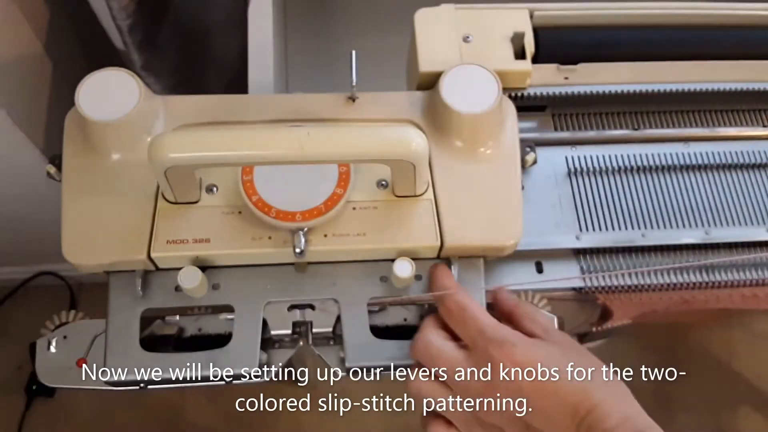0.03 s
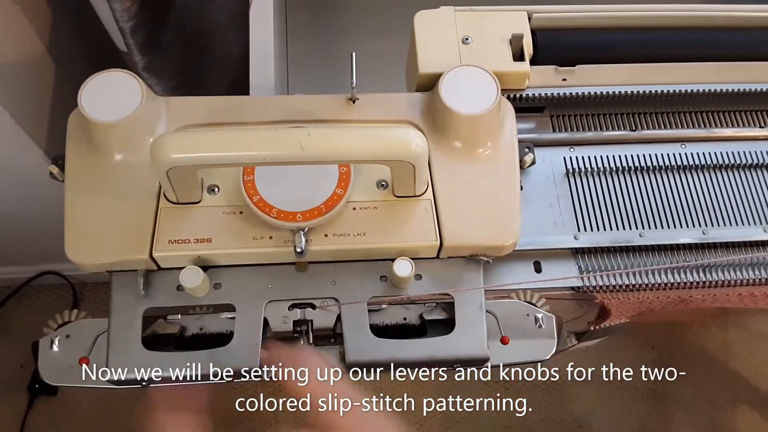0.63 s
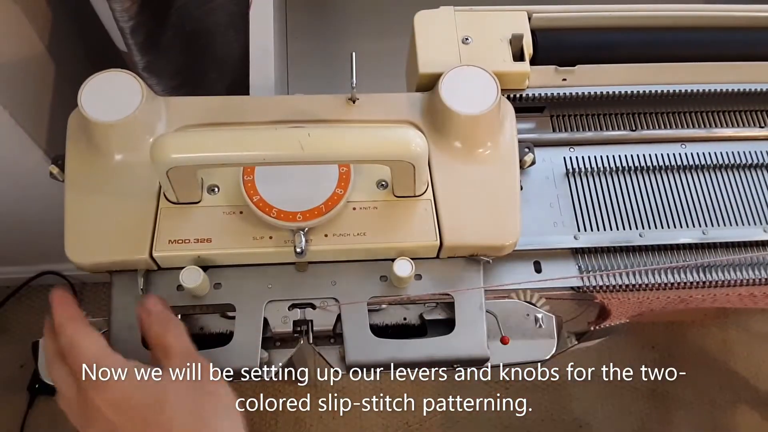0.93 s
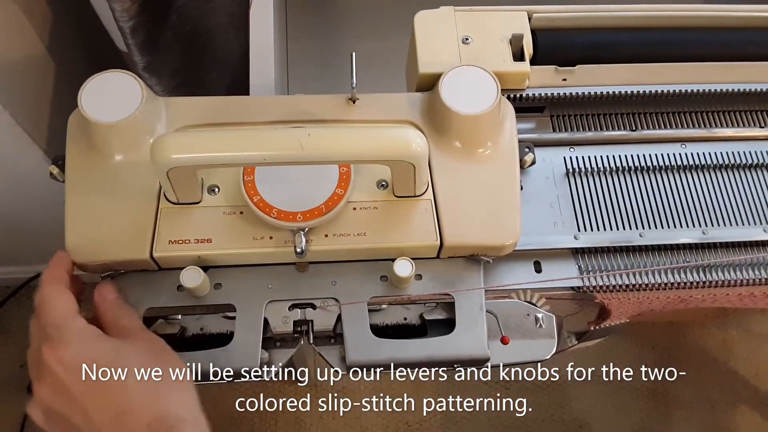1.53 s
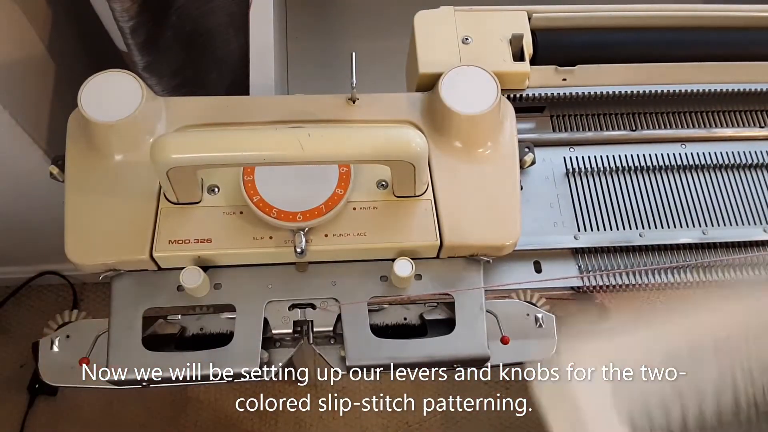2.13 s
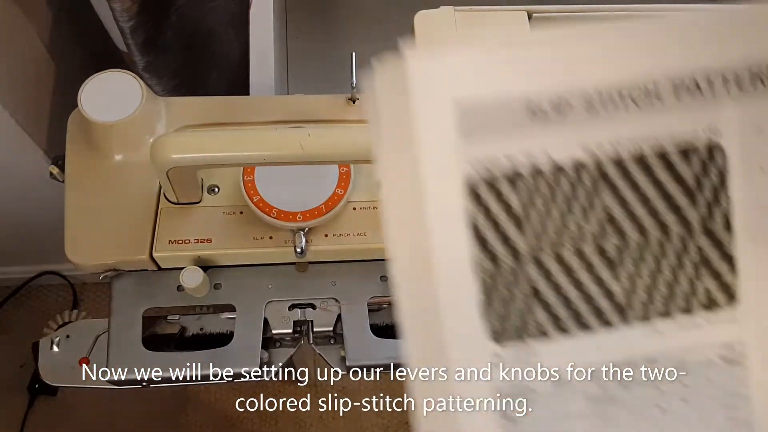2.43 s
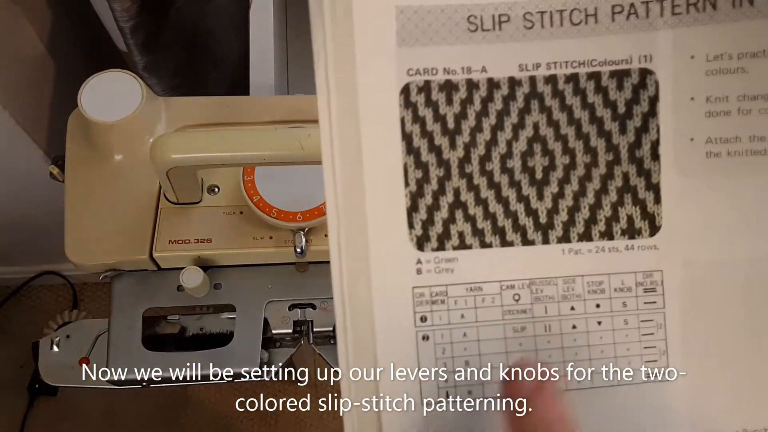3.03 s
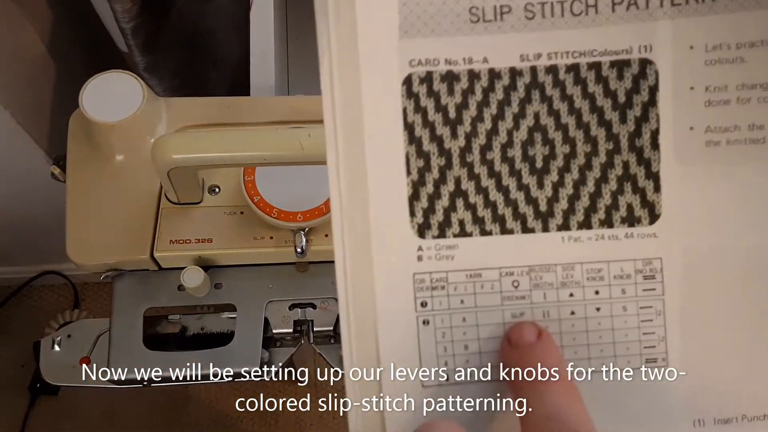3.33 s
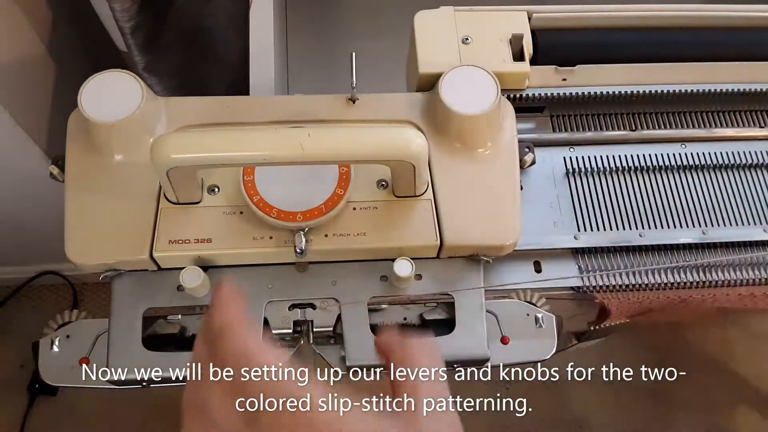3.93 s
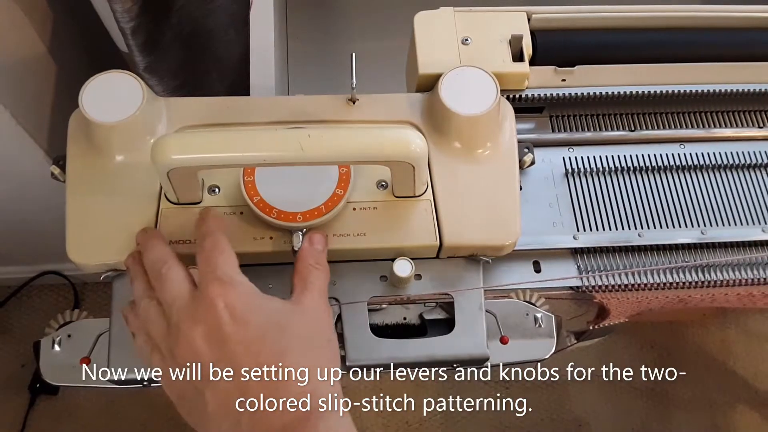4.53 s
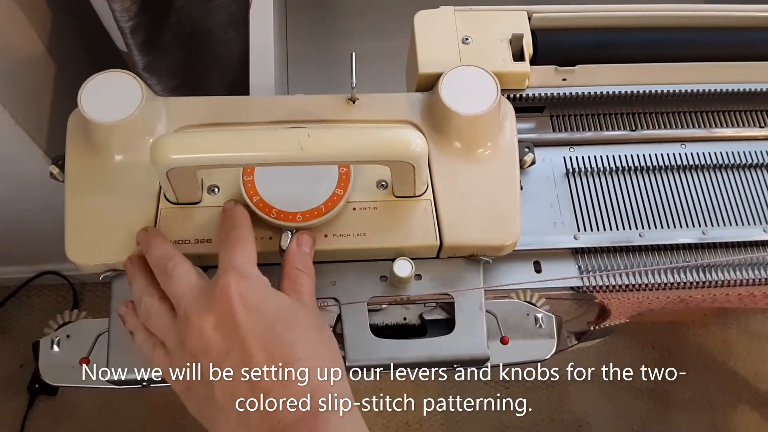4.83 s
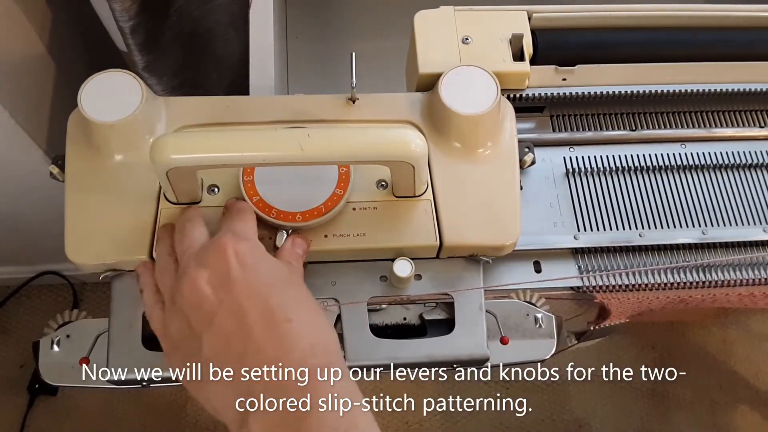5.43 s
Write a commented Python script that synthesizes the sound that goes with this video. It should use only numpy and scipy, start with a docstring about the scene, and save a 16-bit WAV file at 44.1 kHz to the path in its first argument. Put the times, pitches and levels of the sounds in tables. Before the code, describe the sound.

Two sharp, ringing lever clacks on a knitting machine, then faint paper rustles and light clicks over a low room hum.

```python
"""Knitting machine carriage in a small humming room, with hiss and a faint pulsing whine throughout.
A hand snaps over the right lever (0.2 s), then the left (1.5 s): each slips, slams on its stop and
sets the shell and a spring ringing. Gain control ducks the background for a second after each.
The hand slides off the lever (1.8 s); a soft knock on the casing (2.3 s); a paper manual rustles
(2.4-4.5 s). The dial is nudged (4.6 s); light touches, a second knock and a last rustle follow."""
import sys
import numpy as np
from scipy import signal
from scipy.fft import rfft, irfft
from scipy.io import wavfile
from scipy.ndimage import uniform_filter1d, minimum_filter1d

SR = 44100
rng = np.random.default_rng(int(sys.argv[2]) if len(sys.argv) > 2 else 0)


def store_pcm(level_fs):
    """Save levels as 16-bit WAV."""
    pcm = np.round(np.clip(level_fs, -1, 1) * 32767).astype(np.int16)
    wavfile.write(sys.argv[1], SR, np.atleast_2d(pcm).T)


N = 250929

# slip, slam on the stop, rattle: t/s, crack/dB, ring/dB
RIGHT_LEVER_BLOWS = [(.2, -71.5, -53), (.2165, -50.5, -32), (.2195, -43, -29.5), (.2257, -4.5, -17.5),
                     (.232, -9.5, -20.5), (.2355, -13, -18), (.2445, -18.5, -22.5), (.264, -21, -34.5)]
LEFT_LEVER_BLOWS = [(1.484, -59.5, -51.5), (1.5025, -27, -31), (1.5113, -4, -4.5), (1.517, -5.5, -2.5),
                    (1.5195, -11, -1), (1.549, -19, -24)]
DIAL_NUDGE_BLOWS = [(4.618, -46, -43), (4.6225, -42, -36.5), (4.6245, -45, -33), (4.65, -50.5, -46)]
# right lever leaving its catch, fingertips on the dial, casing knocks: t/s, crack/dB, ring/dB
CATCH_BLOWS = [(.2108, -26.5, -52), (.2132, -14.5, -46)]
FINGER_BLOWS = [(4.725, -67, -58), (4.796, -66, -56), (5.044, -78, -53)]
CASING_BLOWS = [(2.343, -54, -64), (5.26, -62, -71)]
# modes of each part: f/Hz, level/dB, t60/s
RIGHT_LEVER_MODES = [(501, -28.5, .12), (705, -19.5, .05), (784, -12, 0.054), (880, -7.5, 0.041),
                     (1151, -9, 0.074), (1647, -4.5, .045), (1780, -2, 0.056), (1927, -3.5, 0.052),
                     (2304, -8, 0.083), (2627, -3, .05), (3330, -7, .05), (4042, -7.5, 0.058),
                     (4366, -5.5, 0.1), (4530, -8, 0.06), (5022, -6, .06), (6330, -6.5, .05),
                     (6892, -5, 0.037), (8280, -8.5, 0.076)]
LEFT_LEVER_MODES = [(368, -37, .12), (522, -27.5, .1), (1030, -1.5, 0.032), (1268.4, -17, 0.045),
                    (1573, -5, 0.03), (1624, -5.5, 0.047), (1760, -4, .035), (1863.5, -1.5, 0.041),
                    (2586, -9, 0.062), (2570, -23, .11), (3985, -14.5, 0.051), (6470, -13, .04),
                    (7120, -17, 0.026)]
DIAL_BODY_MODES = [(1190, -15, 0.026), (1654, -9, 0.035), (1747, 3, 0.027), (1920, -10, 0.034),
                   (3730, -16, 0.038)]
CASING_MODES = [(645, -1, .05), (877, 0, 0.064), (1060, -3, 0.077), (1570, -17, .05)]
# dense shell modes each part wakes: f/Hz, level/dB
RIGHT_SPECTRUM = [(30, -19), (70, -4.5), (130, -6), (260, -8), (480, -20.5), (800, -4.5), (1150, -7),
                  (1420, -15.5), (1750, -0.5), (3100, -4.5), (4600, 2), (6700, -1), (9000, -6.5),
                  (15000, -10.5)]
LEFT_SPECTRUM = [(30, -26), (110, -23.5), (200, -7.5), (400, -11), (720, -20.5), (1600, 1.5), (2200, -5.5),
                 (2600, 2.5), (3000, -2.5), (3900, 2), (5500, -1), (6700, 3), (9000, -9.5), (13500, -15.5),
                 (15500, -16)]
DIAL_SPECTRUM = [(100, -5), (300, 19), (600, 2.5), (1100, 10), (1900, 8), (2800, 0.5), (4600, 2.5),
                 (6200, -7), (9500, -2.5), (16000, -29)]
CASING_SPECTRUM = [(100, -3), (300, 2), (600, -0.5), (1000, -7), (2000, -4), (3000, -12), (6000, -13),
                   (16000, -26)]
# springs and needle bed: t/s, f/Hz, level/dB, t60/s, rise/s
SPRING_RINGS = [(0.226, 84.9, -43, 0.08, .003), (0.23, 246, -32.5, 1.72, 0.0083),
                (0.23, 140, -43.5, 0.25, 0.0062), (0.26, 262.7, -27, 0.2, .02),
                (1.52, 246, -37.5, 0.78, 0.011), (1.528, 187, -22.5, .14, .02),
                (1.53, 268.6, -31, 0.19, 0.014), (4.623, 285, -40.5, 0.22, 0.0083)]
# paper, sleeve, fingers: peak t/s, length/s, level/dB, tilt/(dB/oct), left minus right/dB
RUSTLE_STROKES = [(.16, 0.33, -75.5, -1.5, 0.5), (1.504, 0.089, -64, 1, 0), (1.769, 0.32, -73, -4, 1.5),
                  (2.413, 0.16, -68.5, -1.5, 1.5), (2.74, 0.27, -78, -8, 0), (2.848, 0.16, -64.5, 1, 1),
                  (3.11, 0.057, -78, 6.5, -2), (3.599, 0.082, -74, 5.5, 5), (4.24, 0.86, -68.5, -3.5, -3.5),
                  (5.622, 0.072, -65.5, -1, 2)]
# room decay: f/Hz, t60/s
ROOM_T60 = [(300, 0.26), (1000, 0.15), (2000, 0.165), (5000, 0.155), (12000, .16)]
# noise spectra: f/Hz, level/dB
PAPER_SPECTRUM = [(300, -4), (700, -1), (1100, -9.5), (1900, 6), (2600, -3.5), (5000, -4), (9000, -2.5),
                  (16000, -15.5)]
HUM_SPECTRUM = [(20, -18.5), (45, -10.5), (90, -2.5), (170, -4), (270, 0.5), (380, 1), (480, -8.5),
                (620, -19), (1000, -28.5), (2500, -46), (8000, -68.5)]
HISS_SPECTRUM = [(300, 0.5), (1300, -0.5), (1850, 6), (2400, -0.5), (5500, -3), (7500, -1.5), (11000, -3.5),
                 (15500, -1), (16200, -26.5)]
WHINE_SPECTRUM = [(1000, -40), (5800, -25), (6700, -7), (7200, 0.5), (8000, -6), (8800, -12.5), (9600, -7),
                  (11000, -21), (16000, -29)]
# slow drift of the hum: t/s, level/dB
HUM_DRIFT = [(0, -1), (2.2, -1), (3.2, -3), (3.4, 0), (5.69, 0)]
# stereo width of the hum: f/Hz, side minus mid/dB
HUM_WIDTH = [(60, -8.5), (350, -11), (550, -3.5), (1000, 1.5)]


def clacks(blows, modes, spectrum, crack_t60_s, shell_db, shell_t60_s, swell_s,
           lag_ms, left_db, tilt_db_oct, dulling_per_oct):
    """Each blow: a hard crack, a short shell buzz, then the part's modes. Softer blows are duller."""
    out, t = np.zeros((2, N)), np.arange(16384) / SR
    ear_t = np.maximum(t - np.array([[-lag_ms], [lag_ms]]) / 2000, 0)  # left leads by lag_ms
    rings = np.array([amp(db) * fade(ear_t, t60) * np.sin(2 * np.pi * hz * ear_t)
                      for hz, db, t60 in modes])
    rings *= 1 - np.exp(-t / swell_s)
    envelope = fade(t, crack_t60_s) + amp(shell_db) * fade(t, shell_t60_s)
    hardest_db = max(crack_db for _, crack_db, _ in blows)
    for s, crack_db, ring_db in blows:
        tilt = tilt_db_oct - dulling_per_oct * (hardest_db - crack_db)
        burst = coloured(envelope * rng.standard_normal((2, len(t))), spectrum, tilt)
        weights = amp(ring_db + tilt * octaves(np.array(modes)[:, 0]))
        add(out, s, amp(crack_db) * burst + np.tensordot(weights, rings, 1))
    return panned(out, left_db)


def springs():
    """The jolt spreads into springs and needle bed, which swell and ring low."""
    out, t = np.zeros((2, N)), np.arange(2 * SR) / SR
    for s, hz, db, t60_s, rise_s in SPRING_RINGS:
        tone = amp(db) * (1 - np.exp(-t / rise_s)) * fade(t, t60_s) * np.sin(2 * np.pi * hz * t)
        add(out, s, panned(tone, left_db=3.5))
    return out


def rustle(grain_db=2.5, snaps_per_s=100, snap_db=-8, rise_share=0.55, edge_db=-12.5):
    """Paper, sleeve and fingers slide in uneven grains with tiny snaps; each stroke swells and dies."""
    snaps = rng.standard_normal((2, N)) * (rng.random(N) < snaps_per_s / SR)
    snaps = unit(shaped(snaps, PAPER_SPECTRUM))
    friction = noise(PAPER_SPECTRUM, correlation=0.1) + amp(snap_db) * snaps
    hz, t, bins = signal.stft(friction, SR, nperseg=256)
    power = 0
    for s, length_s, level_db, tilt, left_db in RUSTLE_STROKES:
        away = np.maximum((s - t) / rise_share, (t - s) / (1 - rise_share)) / length_s  # peak 0, ends 1
        stroke = amp(level_db + edge_db * away + tilt * octaves(hz)[:, None])
        power = power + (panned(0.98, left_db)[:, None] * stroke) ** 2
    grains = amp(grain_db * rng.standard_normal(len(t)))
    return signal.istft(bins * np.sqrt(power) * grains, SR, nperseg=256)[1][:, :N]


def room(x, wet_db=-8.5, build_s=0.009, echoes_per_s=5000, late_db=-34, late_t60_s=0.42):
    """Small furnished room: sparse reflections build and die fast over a faint slower tail."""
    t = np.arange(SR // 2) / SR
    taps = rng.standard_normal((2, len(t))) * (rng.random((2, len(t))) < echoes_per_s / SR)
    hz, frame_s, bins = signal.stft(taps, SR, nperseg=256)
    decay = amp(-60 * frame_s / read(ROOM_T60, hz)[:, None]) + amp(late_db - 60 * frame_s / late_t60_s)
    tail = signal.istft(bins * decay, SR, nperseg=256)[1][:, :len(t)]
    tail *= 1 - np.exp(-(t / build_s) ** 2)
    tail /= np.linalg.norm(tail, axis=1, keepdims=True)
    return x + amp(wet_db) * signal.fftconvolve(x, tail, axes=1)[:, :N]


def room_hum(level_db=-61, waver_db=0.34, waver_hz=4):
    """Low wavering noise from all around, most alike between the ears in the bass."""
    t, hz = np.arange(N) / SR, np.fft.rfftfreq(N, 1 / SR)
    drift_db = np.interp(t, *np.transpose(HUM_DRIFT))
    waver = unit(irfft(rfft(rng.standard_normal(N)) * hz * np.exp(-(hz / waver_hz) ** 2), N))
    mid, side = noise(HUM_SPECTRUM, correlation=0)
    side = shaped(side, HUM_WIDTH)
    hum = unit(np.array([mid + side, mid - side]))
    return panned(amp(level_db + drift_db + waver_db * waver) * hum, left_db=1.1)


def whine(level_db=-65.5, rate_hz=30.012, start_s=0.02405, width=0.5, jitter_s=0.0027, uneven_db=1.77):
    """Electronic whine, left only: high noise in slightly uneven pulses over a steady floor."""
    cycles = rate_hz * (np.arange(N) / SR - start_s)
    index = np.round(cycles).astype(int) + 1
    late_cycles = jitter_s * rate_hz * rng.uniform(-0.81, 1, index[-1] + 1)
    strength = amp(uneven_db * rng.standard_normal(len(late_cycles)))
    pulses = strength[index] * np.exp(-(np.sin(np.pi * (cycles - late_cycles[index])) / width) ** 2)
    return amp(level_db) * (pulses + 0.12) * noise(WHINE_SPECTRUM, correlation=1) * [[1], [0]]


def hiss(level_db=-72):
    """Steady microphone noise."""
    return amp(level_db) * noise(HISS_SPECTRUM, correlation=0.09)


def close_pair(x, corner_hz):
    """Long waves reach both microphones alike: the side signal loses its bass."""
    mid, side = (x[0] + x[1]) / 2, (x[0] - x[1]) / 2
    hz = np.fft.rfftfreq(N, 1 / SR)
    side = irfft(rfft(side) * hz / np.hypot(hz, corner_hz), N)
    return np.array([mid + side, mid - side])


def gain_control(x, threshold_db, deepest_db, hold_s, recovery_db_per_s):
    """A loud peak cuts the gain at once; it holds, then creeps back."""
    level_db = 20 * np.log10(abs(x).max(0) + 1e-9)
    over_db = np.clip(level_db - threshold_db, 0, deepest_db)
    half = int(hold_s * SR / 2)
    held_db = -minimum_filter1d(-over_db, 2 * half + 1, origin=half, mode="constant")
    ramp_db = recovery_db_per_s * np.arange(N) / SR
    cut_db = np.maximum.accumulate(held_db + ramp_db) - ramp_db
    return x * amp(-uniform_filter1d(cut_db, size=100))


def amp(db):
    """dB to gain."""
    return 10 ** (np.asarray(db) / 20)


def unit(x):
    """Scale to rms 1."""
    return x / np.sqrt(np.mean(x ** 2) + 1e-20)


def fade(t, t60_s):
    """Exponential decay."""
    return amp(-60 * t / t60_s)


def read(points, hz):
    """Interpolate over log frequency."""
    f, value = np.transpose(points)
    return np.interp(np.log(hz + 1), np.log(f + 1), value)


def octaves(hz):
    """Octaves above 3500 Hz, flat below 400 Hz."""
    return np.log2(np.maximum(hz, 400) / 3500)


def add(mix, s, sound):
    """Mix in a stereo sound at time s."""
    part = mix[:, round(s * SR):][:, :sound.shape[1]]
    part += sound[:, :part.shape[1]]


def panned(x, left_db):
    """Pan by left minus right level."""
    return x * amp([[left_db / 2], [-left_db / 2]])


def shaped(x, spectrum):
    """Zero-phase filter over N samples."""
    return irfft(rfft(x) * amp(read(spectrum, np.fft.rfftfreq(N, 1 / SR))), N)


def noise(spectrum, correlation):
    """Shaped stereo noise, rms 1."""
    a, b = rng.standard_normal((2, N))
    pair = np.array([a, correlation * a + np.sqrt(1 - correlation ** 2) * b])
    return unit(shaped(pair, spectrum))


def coloured(x, spectrum, tilt_db_oct):
    """Minimum-phase filter, unit power gain; keeps attacks sharp."""
    size = x.shape[1]
    hz = np.fft.rfftfreq(size, 1 / SR)
    gain = unit(amp(read(spectrum, hz) + tilt_db_oct * octaves(hz)))
    log_gain = np.log(np.r_[gain, gain[-2:0:-1]])
    response = np.exp(np.conj(signal.hilbert(log_gain)))[:len(hz)]
    return irfft(rfft(x) * response, size)


def scene():
    """Levers, dial, casing, manual and background; the catch ticks stay dry."""
    catch = clacks(CATCH_BLOWS, RIGHT_LEVER_MODES, RIGHT_SPECTRUM,
                   crack_t60_s=0.007, shell_db=-28, shell_t60_s=0.044, swell_s=0.001,
                   lag_ms=0, left_db=-1, tilt_db_oct=2.2, dulling_per_oct=0.15)
    right = clacks(RIGHT_LEVER_BLOWS, RIGHT_LEVER_MODES, RIGHT_SPECTRUM,
                   crack_t60_s=0.041, shell_db=-10, shell_t60_s=0.078, swell_s=0.0014,
                   lag_ms=0.13, left_db=1.14, tilt_db_oct=1.298, dulling_per_oct=0.17)
    left = clacks(LEFT_LEVER_BLOWS, LEFT_LEVER_MODES, LEFT_SPECTRUM,
                  crack_t60_s=0.014, shell_db=-9.5, shell_t60_s=0.06, swell_s=0.002,
                  lag_ms=0.13, left_db=2, tilt_db_oct=0.24, dulling_per_oct=0.06)
    dial = clacks(DIAL_NUDGE_BLOWS, DIAL_BODY_MODES, DIAL_SPECTRUM,
                  crack_t60_s=0.012, shell_db=-6, shell_t60_s=0.14, swell_s=0.00078,
                  lag_ms=0.12, left_db=1, tilt_db_oct=0.48, dulling_per_oct=0.13)
    knocks = clacks(CASING_BLOWS, CASING_MODES, CASING_SPECTRUM,
                    crack_t60_s=0.023, shell_db=-6.5, shell_t60_s=0.086, swell_s=0.0016,
                    lag_ms=0.05, left_db=2, tilt_db_oct=-1.2, dulling_per_oct=0.03)
    touches = clacks(FINGER_BLOWS, DIAL_BODY_MODES, DIAL_SPECTRUM,
                     crack_t60_s=0.054, shell_db=-2, shell_t60_s=0.15, swell_s=0.005,
                     lag_ms=0.12, left_db=5, tilt_db_oct=-1.1, dulling_per_oct=0.1)
    machine = close_pair(catch + room(right + left + dial + touches + knocks), corner_hz=520)
    return machine + springs() + rustle() + room_hum() + whine() + hiss()


def record(dry):
    """Gain control, soft ceiling, 16.1 kHz low-pass."""
    ducked = gain_control(dry, threshold_db=-26, deepest_db=6, hold_s=1.03, recovery_db_per_s=13)
    lowpass = signal.firwin(301, 16100, window=("kaiser", 8), fs=SR)
    return signal.oaconvolve(np.tanh(ducked), lowpass[None], "same")


dry = scene()
out = record(dry)
store_pcm(out)
```